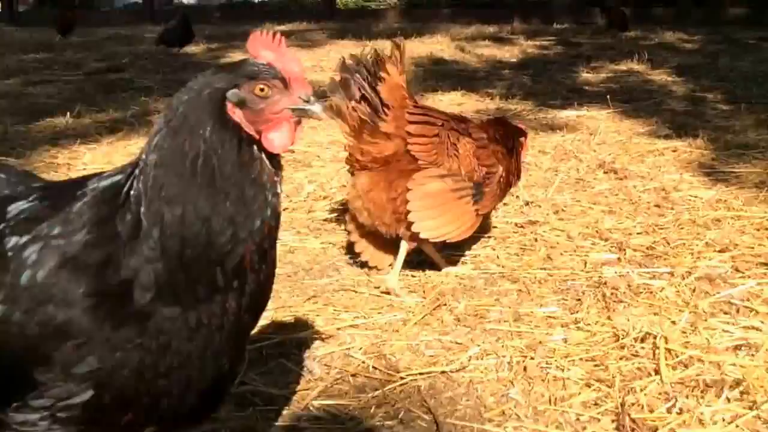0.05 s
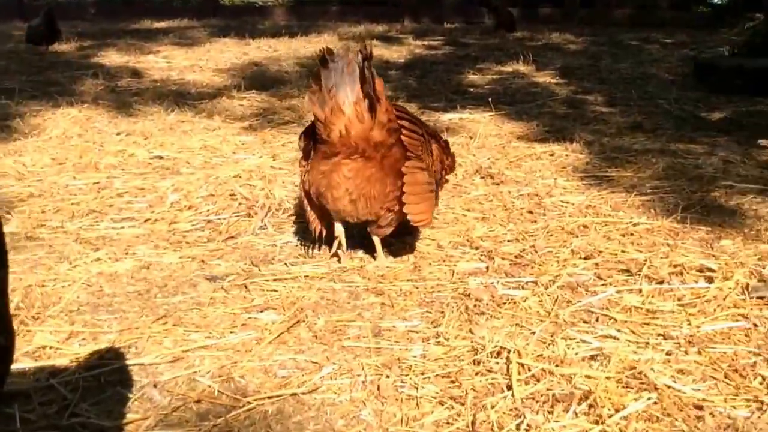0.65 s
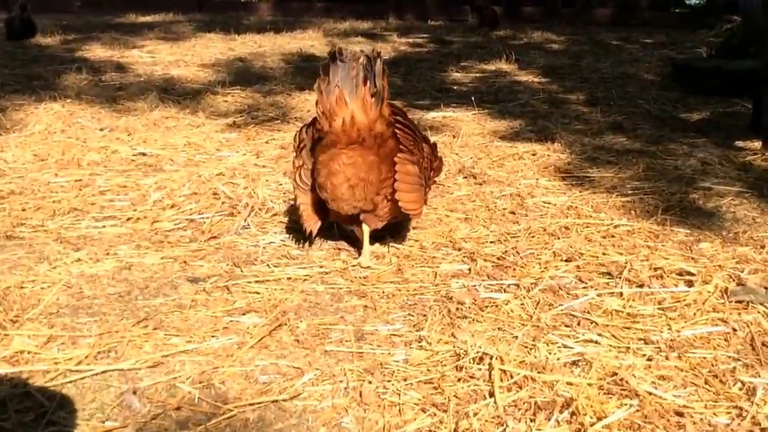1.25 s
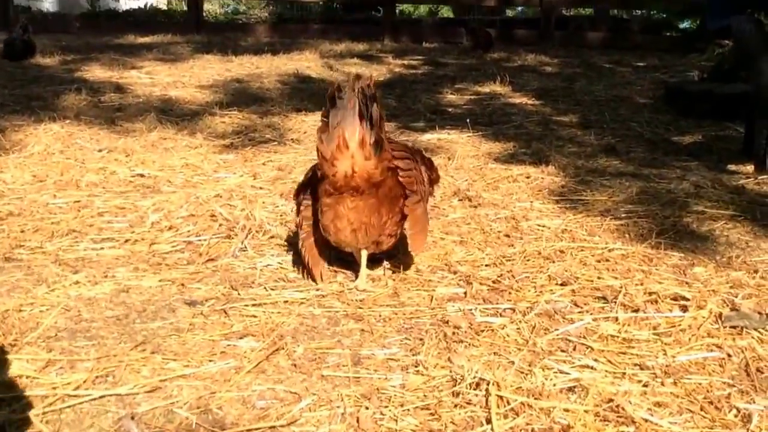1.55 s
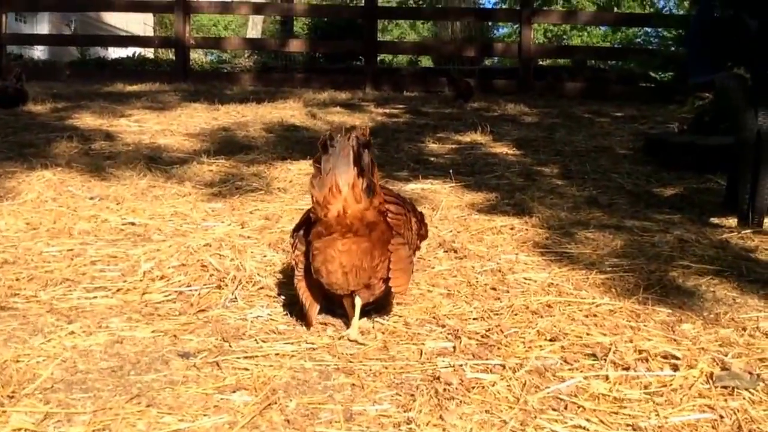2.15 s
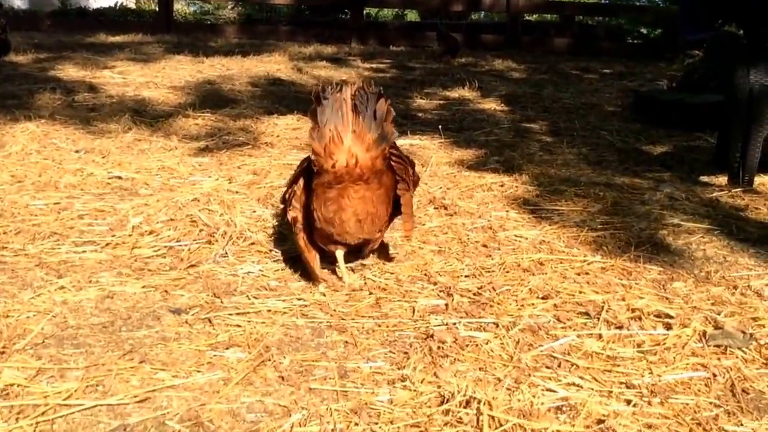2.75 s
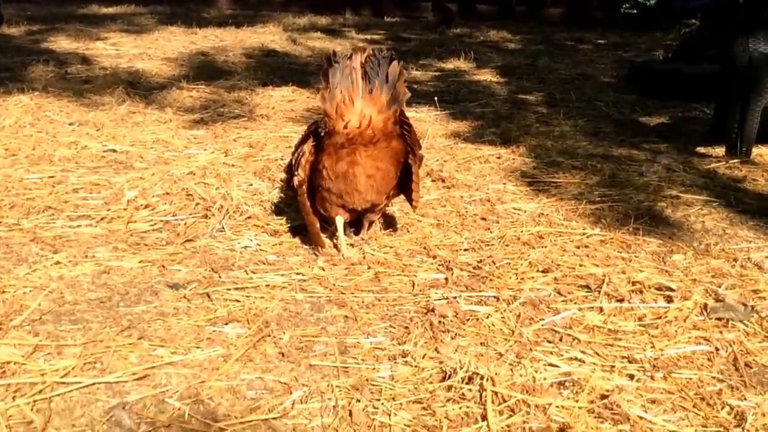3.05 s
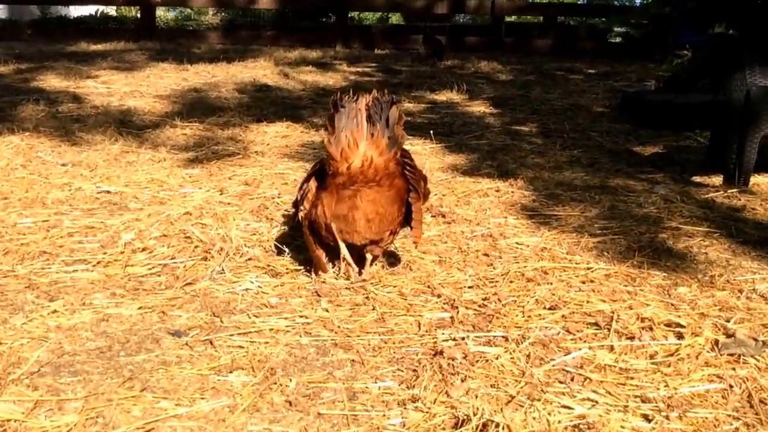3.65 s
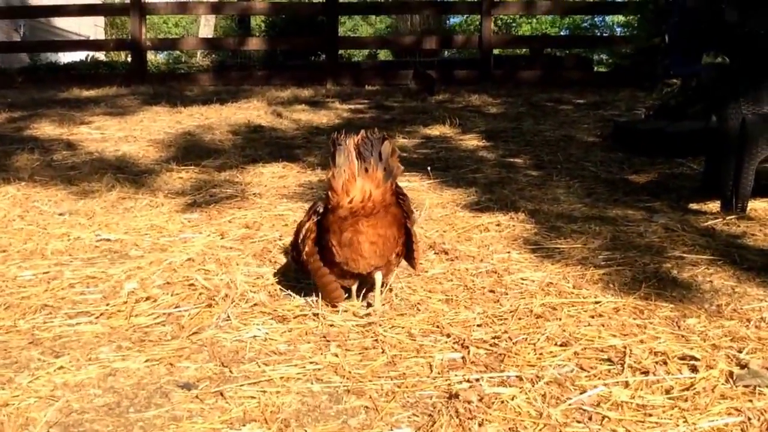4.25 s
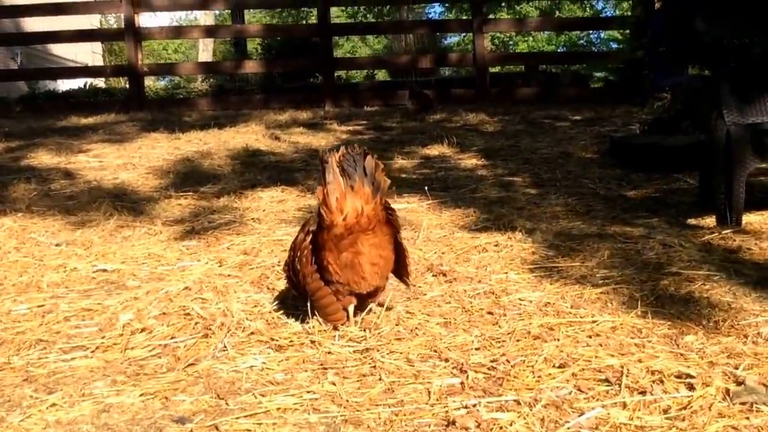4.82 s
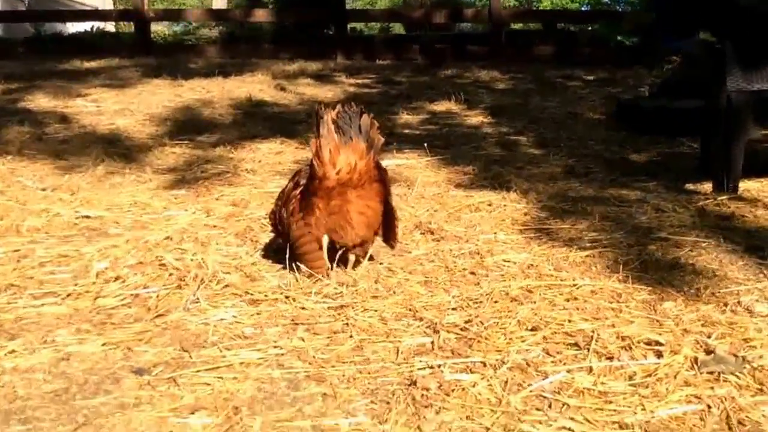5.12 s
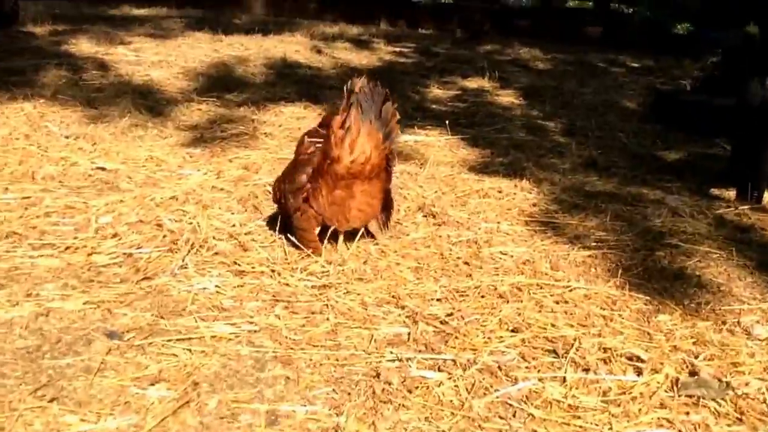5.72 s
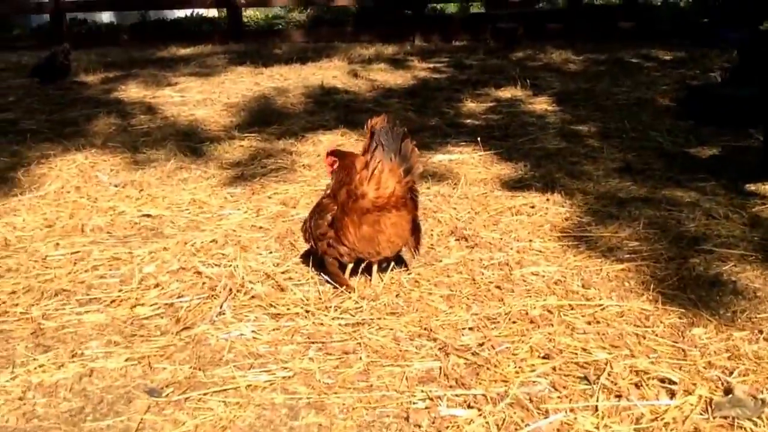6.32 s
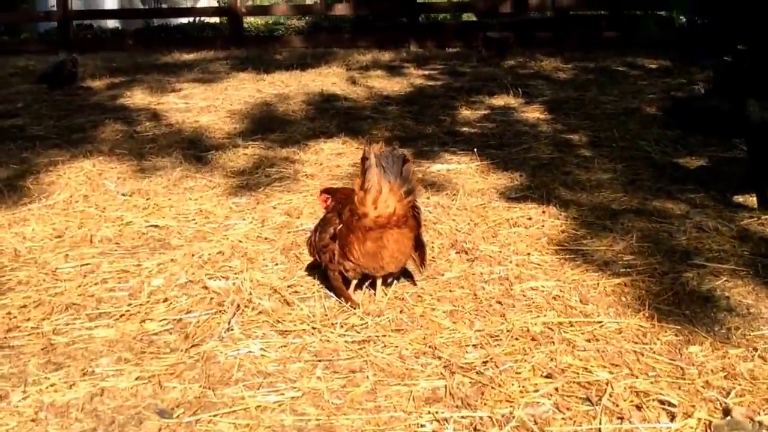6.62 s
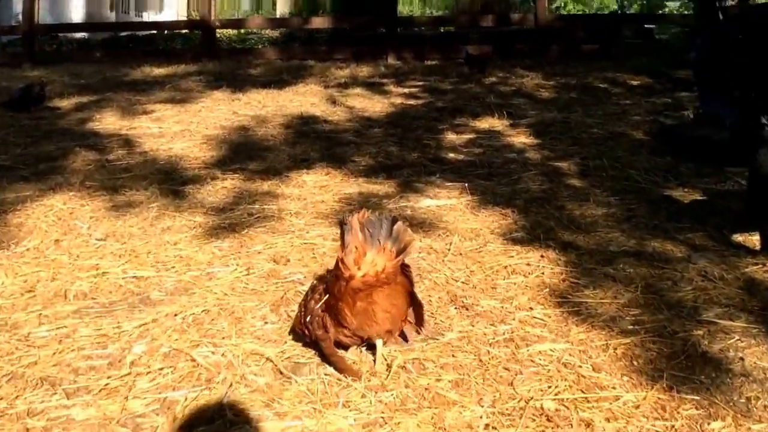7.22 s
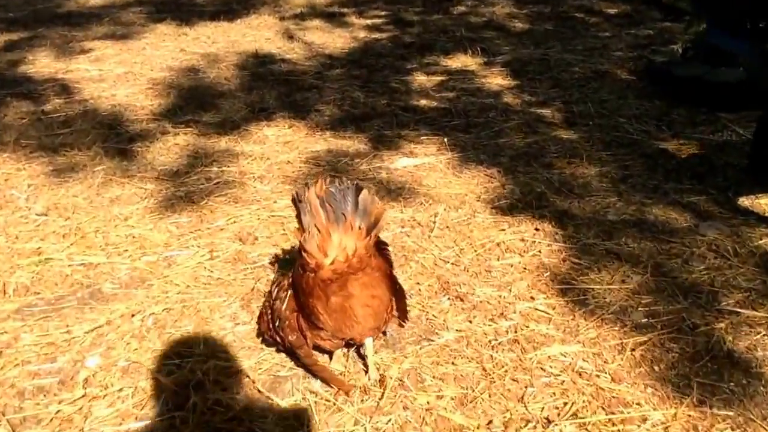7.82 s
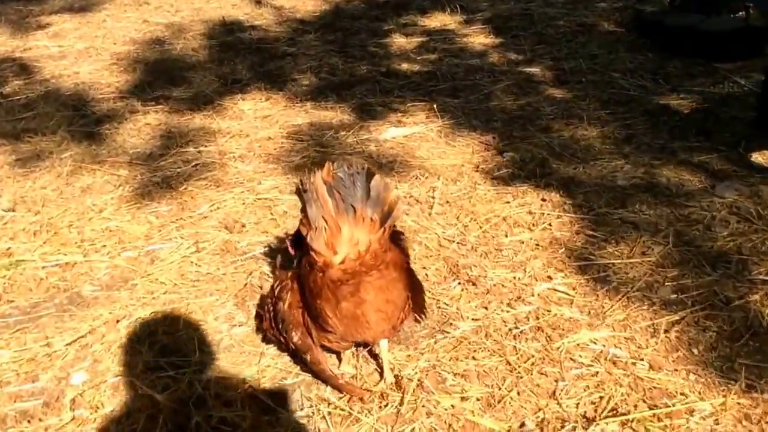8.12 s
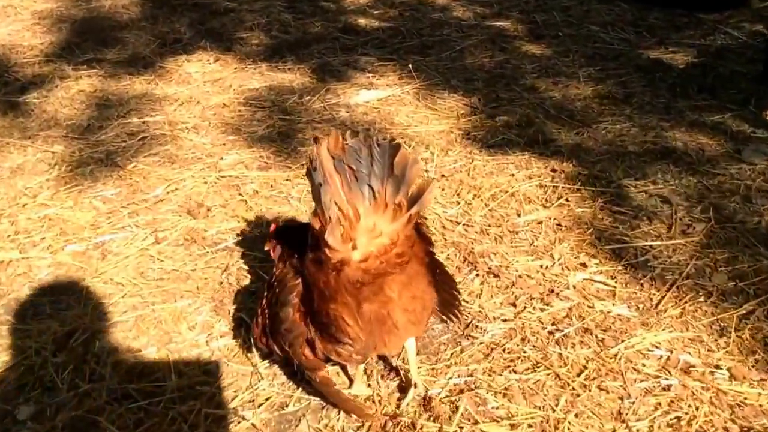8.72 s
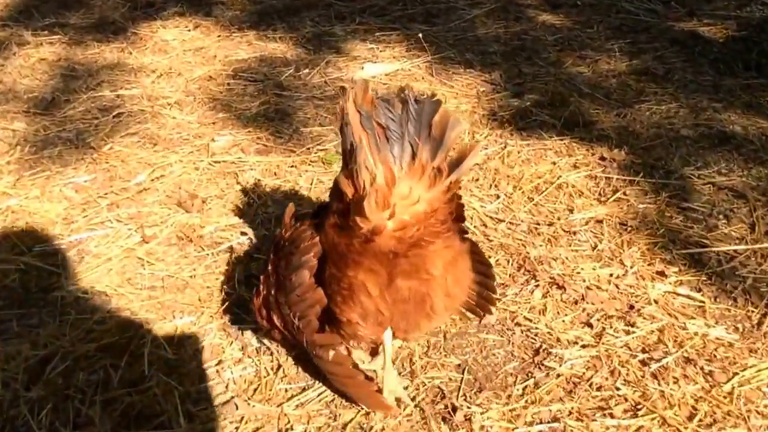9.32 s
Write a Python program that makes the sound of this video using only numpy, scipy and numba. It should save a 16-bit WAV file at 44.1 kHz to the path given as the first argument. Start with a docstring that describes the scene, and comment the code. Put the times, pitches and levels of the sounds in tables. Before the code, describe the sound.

Close to the microphone in an outdoor yard, a hen climbs from a soft moan into a loud rasping cry and three hoarse squawks. For a few seconds she only clucks quietly while straw rustles and snaps underfoot. Then she winds up again into six quick squawks. Light wind rumbles faintly on the microphone, with a few soft handling thumps.

```python
"""A hen near the microphone, in a straw-covered yard, winds up twice from a soft moan into a run of
hoarse squawks, with quiet clucks between. Puffs from her syrinx ring her throat and, as the beak opens,
its rasping upper resonances. Straw rustles and snaps underfoot and small birds whistle far off in the
open air. Light wind rumbles on the microphone, and handling gives it a few dull thumps."""
import sys
import numpy as np
from scipy import signal
from scipy.io import wavfile
from scipy.ndimage import uniform_filter1d
from numba import njit

SR = 44100
rng = np.random.default_rng(int(sys.argv[2]) if len(sys.argv) > 2 else 0)


def bounce(signal):
    """Save signal as a 16-bit WAV file at the path given by the first command-line argument."""
    frames = np.transpose(np.atleast_2d(signal))
    limited = np.clip(frames, -1, 1)
    pcm = np.round(limited * 32767).astype(np.int16)
    wavfile.write(sys.argv[1], SR, pcm)


N = 417627
TIME = np.arange(N) / SR


def from_db(db):
    """Decibels to gain."""
    return 10 ** (np.asarray(db) / 20)


def unit_rms(x):
    """Scale to unit power."""
    return x / np.sqrt(np.mean(x ** 2) + 1e-20)


def curves_at(rows, t):
    """The columns of a curve table, read at times t."""
    times, *columns = np.transpose(rows)
    return [np.interp(t, times, column) for column in columns]


def cut(x, hz, kind, order=2):
    """Butterworth filter."""
    return signal.sosfilt(signal.butter(order, np.clip(hz, 10, SR * .49), kind, fs=SR, output="sos"), x)


def drift(rate, t):
    """A random wander of rms 1, with about `rate` turns a second."""
    knots = np.arange(t[0], t[-1] + 2 / rate, 1 / rate)
    return unit_rms(np.interp(t, knots, rng.standard_normal(len(knots))))


@njit
def resonate(x, hz, width_hz):
    """A resonance whose centre moves sample by sample; gain 1 at its peak."""
    y, r = np.zeros(len(x)), np.exp(-np.pi * width_hz / SR)
    for i in range(2, len(x)):
        drive = (1 - r * r) / 2 * (x[i] - x[i - 2])
        y[i] = drive + 2 * r * np.cos(2 * np.pi * hz[i] / SR) * y[i - 1] - r * r * y[i - 2]
    return y


def formant(x, hz, width_hz):
    """A resonance applied twice, for steep skirts."""
    hz = hz * np.ones(len(x))
    return resonate(resonate(x, hz, float(width_hz)), hz, float(width_hz))


def steady(x, window_s):
    """Hold the power at 1, keeping flutter faster than the window."""
    size = max(int(window_s * SR), 2)
    return x / np.sqrt(np.abs(uniform_filter1d(uniform_filter1d(x * x, size), size)) + 1e-12)


def coloured_noise(spectrum, flicker_db, flicker_rate):
    """Half-octave bands of noise on a spectrum, each flickering by itself; rms 1."""
    hz, db = np.transpose(spectrum)
    edges = np.geomspace(hz[0], hz[-1], int(2 * np.log2(hz[-1] / hz[0])) + 2)
    white, out = rng.standard_normal((2, N)), 0
    for k, (low, high) in enumerate(zip(edges, edges[1:])):
        band_db = np.interp(np.log(low * high) / 2, np.log(hz), db)
        gain = from_db(band_db + flicker_db * drift(flicker_rate, TIME))
        out += gain * cut(white[k % 2], [low, high], "band")
    return unit_rms(out)


# Colour of the open air all round the yard: frequency_hz, relative_db
AIR_SPECTRUM = [(200, -10), (500, 2.5), (1000, -3.5), (2000, -5), (4200, -6.5), (6500, -11.5),
                (15000, -20.5)]
# Its level at the microphone: time_s, level_db
AIR_LEVEL = [(0, -71.5), (2.7, -70), (4.8, -67), (6.5, -65.5), (9.47, -64)]

def open_air():
    """A faint, broad hush that slowly grows."""
    level_db, = curves_at(AIR_LEVEL, TIME)
    return from_db(level_db) * coloured_noise(AIR_SPECTRUM, flicker_db=2, flicker_rate=10)


# Colour of the wind right on the microphone: frequency_hz, relative_db
WIND_SPECTRUM = [(25, -19), (50, -4), (110, 2.5), (180, -7), (300, -13), (600, -31)]
# Level of the low rumble, which dips under the hen's first loud cry: time_s, level_db
RUMBLE_LEVEL = [(0, -63), (.45, -60.5), (1.1, -60), (1.35, -72), (2.3, -64), (3.7, -61.5), (4.5, -60),
                (5.4, -62.5), (7.9, -60.5), (9.2, -62), (9.45, -74)]

def microphone_wind():
    """Light wind buffets the microphone with a low, uneven rumble."""
    level_db, = curves_at(RUMBLE_LEVEL, TIME)
    return from_db(level_db) * coloured_noise(WIND_SPECTRUM, flicker_db=3, flicker_rate=8)


# Soft, low handling thumps on the microphone: start_s, level_db
THUMPS = [(2.336, -52), (6.15, -56), (6.35, -55), (6.526, -52.5), (7.941, -50)]

def handling_thumps(low_hz=42, high_hz=115, decay_s=.055):
    """Dull thuds: low noise that starts at once and dies quickly."""
    envelope = sum(from_db(db) * (TIME > s) * np.exp(-np.minimum(np.abs(TIME - s) / decay_s, 20))
                   for s, db in THUMPS)
    rumble = steady(cut(rng.standard_normal(N), [low_hz, high_hz], "band"), window_s=.0366)
    return cut(envelope * rumble, 2 * high_hz, "low")


def yard_echo(x, echo_db=-30, t60_s=.3545, dull_hz=5000):
    """Fence and trees add a faint, dull tail to the direct sound."""
    t = np.arange(SR // 2) / SR
    scatter = rng.standard_normal(len(t)) * (t > .012) * from_db(-60 * t / t60_s)
    scatter = cut(scatter, dull_hz, "low")
    return x + from_db(echo_db) * signal.fftconvolve(x, scatter / np.linalg.norm(scatter))[:N]


# One whistle from a bird far off: time_s, pitch_hz, level_db
FAR_WHISTLE = [(3.77, 2100, -73), (4.05, 2140, -72.5), (4.11, 2330, -79.5), (4.17, 3300, -68.5),
               (4.2, 3400, -60.5), (4.26, 2460, -75)]

def bird_whistle():
    """A thin held whistle that ends in an arch."""
    pitch_hz, level_db = curves_at(FAR_WHISTLE, TIME)
    sounding = (TIME > FAR_WHISTLE[0][0]) & (TIME < FAR_WHISTLE[-1][0])
    cycles = np.cumsum(pitch_hz * (1 + .0074 * drift(100, TIME))) / SR
    return sounding * from_db(level_db) * np.sin(2 * np.pi * cycles)


# A distant bird's faint high note, from 0.5 s to 0.6 s: end_s, start_s, level_db, centre_hz, width_hz
FAR_HIGH_CALL = (0.6, 0.5, -73.5, 6752, 600)

def bird_high_call(end_s, start_s, level_db, centre_hz, width_hz):
    """A faint, sibilant note of narrow noise that swells and fades."""
    swell = np.sin(np.pi * np.clip((TIME - start_s) / (end_s - start_s), 0, 1))
    return from_db(level_db) * swell * unit_rms(formant(rng.standard_normal(N), centre_hz, width_hz))


# Hiss of the straw on the yard floor: frequency_hz, relative_db
STRAW_SPECTRUM = [(1470, -38), (2500, -15.5), (3240, -14), (4100, 3.5), (4530, -5.5), (6280, -14),
                  (9320, 1.5), (14700, -3.5), (15400, -10)]
# Swells of high hiss: straw scuffs, and the airy top of the hen's squawks near 1.5 s and 2.6 s:
# middle_s, relative_db, length_s
HISS_SWELLS = [(.01, -70, 0.057), (0.435, -74, 0.07), (1.513, -63, 0.24), (2.046, -56.5, 0.056),
               (2.57, -58, 0.077), (2.83, -60, 0.076), (3.376, -64.5, .09), (4.55, -70, 0.47),
               (5.017, -65.5, 0.075), (5.544, -65.5, .08), (5.704, -54, 0.088), (6.025, -59.5, 0.062),
               (8.242, -67.5, 0.077), (8.728, -62, 0.032), (9.053, -63.5, 0.29)]

def straw(tread_from_s=.86, cracks_per_s=650, crack_gain=.48, clump_db=2.5, gain_db=1):
    """Stalks slide with a hiss and crackle in clumps; swells of that hiss rise over the treading."""
    floor_db = np.where(TIME < tread_from_s, -84, -71) + 2.66 * drift(16, TIME)   # still, then trodden
    power = from_db(floor_db) ** 2
    for middle_s, db, length_s in HISS_SWELLS:
        power += from_db(db) ** 2 * np.exp(-np.minimum((2 * (TIME - middle_s) / length_s) ** 2, 20))
    cracking = rng.random(N) < cracks_per_s / SR
    sizes = from_db(11 * np.minimum(rng.exponential(1, N), 4)) * rng.choice([-1, 1], N)
    cracks = unit_rms(cut(formant(cracking * sizes, 8400, width_hz=7000), 2500, "high"))
    hiss = coloured_noise(STRAW_SPECTRUM, flicker_db=.6, flicker_rate=41)
    clumps = from_db(gain_db + clump_db * drift(80, TIME))
    return np.sqrt(power) * clumps * (hiss + crack_gain * cracks)


# Straw and twigs breaking underfoot: start_s, peak_db, band_hz
SNAPS = [(2.8257, -35, 994), (2.824, -42, 3060), (4.9012, -44, 3060), (5.264, -49, 2580),
         (5.414, -41.5, 6300), (5.416, -44, 1600), (5.507, -53, 9550), (5.63, -36.5, 10000),
         (5.658, -50, 9300)]

def snaps(crack_s=.0021, tail_s=.022, tail_gain=.12):
    """A dry stalk breaks: a sharp crack and a short crumbling tail."""
    out, t = np.zeros(N), np.arange(SR // 10) / SR
    envelope = np.exp(-t / crack_s) + tail_gain * np.exp(-t / tail_s)
    for start_s, peak_db, band_hz in SNAPS:
        burst = rng.standard_normal(len(t)) * envelope
        burst = cut(burst, [band_hz * .74, band_hz * 1.1], "band", order=1)
        i = int(start_s * SR)
        out[i:i + len(t)] += from_db(peak_db) * burst / np.abs(burst).max()
    return out


def syrinx(t, pitch_hz, rough, jitter_s=.00026, wander=.05, shimmer_db=4.5, hiss=.12):
    """One puff per cycle; when rough, the puffs stray in time and strength and carry turbulence."""
    cycles = np.cumsum(pitch_hz * (1 + wander * rough * drift(110, t))) / SR
    at = np.interp(np.arange(1, cycles[-1]), cycles, np.arange(len(t)))
    puff_rough = rough[at.astype(int)]
    timing, strength = rng.standard_normal((len(at), 2)).T
    at = np.clip(at + jitter_s * SR * puff_rough * timing, 0, len(t) - 2)
    size = from_db(shimmer_db * puff_rough * strength)
    sample, late = at.astype(int), at % 1   # each puff is shared between two samples
    puffs = np.bincount(sample, size * (1 - late), len(t)) + np.bincount(sample + 1, size * late, len(t))
    turbulence = hiss * rough * (1 + np.cos(2 * np.pi * cycles)) * rng.standard_normal(len(t))
    return puffs + turbulence


# The hen's quiet clucks, near the microphone: time_s, length_s, relative_db, throat_hz
CLUCKS = [(0.162, 0.02, -68.5, 740), (0.592, 0.0263, -51.5, 620), (2.219, 0.0357, -57, 600),
          (2.943, 0.029, -60.5, 610), (3.341, 0.022, -67, 660), (3.687, 0.026, -59, 606),
          (3.982, 0.025, -53.5, 637), (4.485, 0.028, -62, 640), (4.742, 0.026, -53.5, 614),
          (5.326, 0.028, -70, 860), (6.084, 0.043, -84, 493), (6.264, 0.025, -64.5, 535),
          (6.425, 0.033, -74, 620), (6.582, 0.039, -68.5, 530), (7.932, 0.031, -58.5, 694),
          (9.226, 0.03, -53, 560)]

def clucks(start_hz=290, top_hz=390, gain_db=5):
    """A short run of puffs, quickening, into a nearly closed throat that sinks in pitch."""
    out = np.zeros(N)
    for time_s, length_s, db, throat_hz in CLUCKS:
        t = np.arange(int((length_s + .073) * SR)) / SR
        progress = t / length_s
        pitch_hz = np.interp(progress, [0, .5], [start_hz, top_hz]) * (1 + .0477 * rng.standard_normal())
        puffs = syrinx(t, pitch_hz, rough=np.full(len(t), .45))
        puffs *= np.interp(progress, [0, .35, .85, 1.05], [.82, .23, .87, .025])
        body = formant(puffs, throat_hz * np.interp(progress, [.3, 1], [1.06, .78]), width_hz=377)
        body = cut(body, 1220, "low", order=4)
        i = int((time_s - .003) * SR)
        out[i:i + len(t)] += from_db(db + gain_db) * unit_rms(body)
    return out


# Moments when her hoarse voice rings pure: start_s, end_s, pitch_hz, relative_db
PURE_NOTES = [(0.904, .926, 942, 3), (1.187, 1.228, 995.4, 3), (1.256, 1.271, 996.4, 5),
              (1.319, 1.359, 1012, 2.5), (1.648, 1.678, 1008, 1.5), (1.79, 1.792, 994, 3.5),
              (2.535, 2.546, 996, 5.5), (7.265, 7.284, 1110, 4)]

def throat_note(t, puffs, throat_hz, lock_depth=.9):
    """The main resonance, now and then locking into a louder, pure note; returns sound and lock depth."""
    hoarse = steady(formant(puffs, throat_hz, width_hz=219), window_s=.012)
    start, end, hz, db = np.transpose(PURE_NOTES)
    locked = ((t > start[:, None]) & (t < end[:, None])).any(axis=0)
    lock = np.clip(lock_depth * uniform_filter1d(1. * locked, size=300), 0, 1)
    nearest = np.abs(t - (start + end)[:, None] / 2).argmin(axis=0)
    cycles = np.cumsum(hz[nearest] * (1 + .007 * drift(150, t))) / SR
    note = from_db(db[nearest]) * np.sqrt(2) * np.sin(2 * np.pi * cycles)
    return np.sqrt(1 - lock) * hoarse + np.sqrt(lock) * note, lock


# Upper resonances of throat and beak in three head postures: centre_hz, width_hz, relative_db
HEAD_UP = [(1350, 330, 13.5), (1734, 300, 3), (2310, 430, -2), (2977, 390, 0), (3970, 520, -9.5),
           (5225, 300, -18), (6304, 550, -19), (7930, 550, -20.5), (9080, 600, -23), (12480, 4000, -39.5)]
HEAD_TURNED = [(1390, 230, 6), (2015, 180, 4.5), (2550, 730, -2), (3004, 430, -0.5), (4220, 560, -5.5),
               (5430, 374, -20), (7600, 3100, -17)]
HEAD_LOW = [(1448, 370, 5), (1918, 290, 2.5), (2700, 236, 6), (3640, 500, -19), (4250, 380, -12.5),
            (6060, 1800, -28), (8700, 2000, -22.5)]
# Each posture: resonances, notch_hz
UP, TURNED, LOW = (HEAD_UP, 1700), (HEAD_TURNED, 1590), (HEAD_LOW, 2300)

def rasp(t, puffs, rasp_db, neck_tuning, resonances, notch_hz, notch_width_hz=110):
    """Upper resonances: a harder rasp is brighter; the stretching neck lowers those of the windpipe."""
    db_per_octave = .47 * np.clip(rasp_db + 16.5, -10, 10)
    rings = 0
    for k, (hz, width_hz, db) in enumerate(resonances):
        tuning = neck_tuning if 2700 < hz < 10000 else 1   # the windpipe's range
        gain = from_db(db + db_per_octave * np.log2(hz / 1500))
        rings += (-1) ** k * gain * formant(puffs, hz * tuning, width_hz)
    notch = [notch_hz - notch_width_hz / 2, notch_hz + notch_width_hz / 2]
    rings = cut(rings, notch, "bandstop", order=1)
    return from_db(rasp_db + 1.5 * drift(90, t)) * steady(rings, window_s=.0061)


def hen_voice(t, pitch_hz, rough, throat_hz, level_db, rasp_db, chest_db, attack_s, crest_s, stretch,
              posture, release_db=19, flutter_db=1.1, neck_settle_s=.12, muffle_hz=1020):
    """One call: the puffs ring the throat, a lower chest tone and the rasping beak resonances."""
    release = np.clip((t - crest_s) / max(t[-1] - crest_s, 1 / SR), 0, 1)
    level_db = level_db - release_db * release + flutter_db * drift(42, t)
    beak_open = np.clip(2 * rough - .3, 0, 1)
    puffs = syrinx(t, pitch_hz * (1 + .012 * drift(45, t)), rough)
    quiver = 1 + .057 * rough * drift(69.44, t)
    throat, lock = throat_note(t, puffs, throat_hz * quiver)
    rasp_db = rasp_db - 6.5 * release - 3 * lock   # a dying or locked note sheds rasp
    chest_gain = from_db(chest_db - 6 * (1 - beak_open) - 3.9 * lock)
    tone = throat + chest_gain * steady(formant(puffs, 2 * pitch_hz, width_hz=164), window_s=.0384)
    onset = 1 - np.exp(-(t - t[0]) / attack_s)
    ending = np.clip((t[-1] - t) / .0039, 0, 1)
    neck_tuning = 1 + stretch * np.exp(-np.cumsum(beak_open ** 4) / SR / neck_settle_s)
    # beak closed: a muffled moan over the hum of its fundamental
    hum = steady(formant(puffs, pitch_hz, width_hz=120), window_s=.021)
    moan = from_db(level_db) * cut(tone, muffle_hz, "low", order=8)
    moan += from_db(level_db / 2 - 32.75) * hum
    # beak open: a rasping cry over a low growl of slow, irregular puffs
    slow_puffs = syrinx(t, pitch_hz / 2, rough, jitter_s=.0007)
    growl = rough ** 3 * steady(cut(slow_puffs, [250, 560], "band"), window_s=.09)
    cry = from_db(level_db) * (tone + onset * rasp(t, puffs, rasp_db, neck_tuning, *posture))
    cry += from_db(level_db / 2 - 40.75) * growl
    call = onset * ending * ((1 - beak_open) * moan + beak_open * cry)
    return np.interp(TIME, t, call, left=0, right=0)


# Her climbs from moan to cry; the first breaks register: time_s, pitch_hz, roughness (0-1), throat_hz
FIRST_CLIMB = [(.25, 220.3, 0.17, 680), (.41, 215.7, 0.24, 653), (0.459, 238, 0.12, 690),
               (0.579, 252.3, .13, 684), (.66, 283.6, .26, 773), (.742, 270, .24, 747),
               (.752, 397.2, 0.23, 715), (.86, 438, .32, 803), (.89, 323.1, 0.6, 844),
               (1.03, 313.6, 0.68, 994), (1.42, 372.7, 0.66, 970)]
SECOND_CLIMB = [(6.631, 378.4, .25, 750), (6.9, 487.7, .47, 1062), (7.08, 386.2, .72, 1152),
                (7.4, 363.1, .62, 1050)]
# How each climb swells at the microphone: time_s, relative_db
FIRST_SWELL, SECOND_SWELL = [
    [(0.275, -53), (0.607, -41.5), (0.681, -44.5), (0.857, -30), (0.899, -36), (0.917, -28.5),
     (0.931, -32.5), (1.305, -26)],
    [(6.65, -65.5), (6.81, -46.5), (6.832, -54), (6.842, -42), (6.998, -37), (7.038, -38.5),
     (7.264, -33), (7.395, -30.5)],
]
# The two wind-ups, near by; rasp and chest are relative to the throat note:
# start_s, end_s, release_s, rasp_db, rasp_db_per_s, chest_db, stretch_share, climb, swell, posture
WIND_UPS = [(0.254, 1.468, .045, -3.5, 25, -5.5, 0.23, FIRST_CLIMB, FIRST_SWELL, UP),
            (6.63, 7.442, 0.048, -16.5, 7.5, -16, 0.32, SECOND_CLIMB, SECOND_SWELL, TURNED)]

def wind_up(start_s, end_s, release_s, rasp_db, rasp_db_per_s, chest_db, stretch, climb, swell, posture,
            attack_s=.0098, gain_db=-.47):
    """A long call that climbs from a moan to a cry, its rasp growing steadily up to the crest."""
    t, crest_s = TIME[(TIME >= start_s) & (TIME <= end_s)], end_s - release_s
    pitch_hz, rough, throat_hz = curves_at(climb, t)
    swell_db, = curves_at(swell, t)
    rasp_db = rasp_db - rasp_db_per_s * np.maximum(crest_s - t, 0)
    return hen_voice(t, pitch_hz, rough, throat_hz, swell_db + gain_db, rasp_db, chest_db,
                     attack_s, crest_s, stretch, posture)


# Her squawks, near the microphone; rasp and chest are relative to the throat note: start_s, end_s,
# attack_s, release_s, crest_db, swell_db, rasp_db, chest_db, stretch_share, throat_hz, posture
SQUAWKS = [(1.558, 1.872, 0.0039, 0.052, -26, 4, -8, -7.5, 0.13, 969, UP),
           (1.948, 2.176, 0.0052, 0.039, -27, 2.5, -11.5, -9, 0.056, 938, UP),
           (2.333, 2.643, .003, .05, -26.5, 7, -14.5, -11.5, 0, 992, LOW),
           (7.489, 7.678, 0.01, 0.077, -30, 9, -17, -32, 0.023, 1070, TURNED),
           (7.759, 7.947, 0.0079, 0.071, -31, 10, -16.5, -32, 0.0067, 1050, TURNED),
           (8.133, 8.456, 0.0074, .065, -29.5, 9, -12.5, -20.5, .08, 1042, LOW),
           (8.553, 8.791, 0.0049, 0.047, -30, 5.5, -12, -24, 0.0094, 1026, LOW),
           (8.893, 9.126, 0.0027, .062, -29.5, 8, -11, -24, 0.011, 1000, LOW),
           (9.303, 9.558, 0.0023, 0.052, -30.5, 8.5, -12.5, -19, 0, 1032, LOW)]

def squawk(start_s, end_s, attack_s, release_s, crest_db, swell_db, rasp_db, chest_db, stretch,
           throat_hz, posture, crest_pitch_hz=346.6, roughness=.872, slack_db=22):
    """Effort swells to a crest and goes slack; throat and rasp rise with it while the puffs slow."""
    t, crest_s = TIME[(TIME >= start_s) & (TIME <= end_s)], end_s - release_s
    push_db = -swell_db * np.clip((crest_s - t) / (crest_s - start_s), 0, 1) ** 1.298
    effort_db = push_db - slack_db * np.clip((t - crest_s) / release_s, 0, 1)
    pitch_hz = crest_pitch_hz * (1 - .0362 * effort_db)
    throat_hz = throat_hz * (1 + .0124 * effort_db)
    return hen_voice(t, pitch_hz, np.full(len(t), roughness), throat_hz, crest_db + push_db,
                     rasp_db + .37 * push_db, chest_db, attack_s, crest_s, stretch, posture)


def scene():
    """One microphone in the yard: the hen and the straw near by, birds far off, wind and open air."""
    hen = sum(wind_up(*row) for row in WIND_UPS) + sum(squawk(*row) for row in SQUAWKS) + clucks()
    background = microphone_wind() + open_air()
    echoing = yard_echo(hen + snaps() + bird_whistle() + bird_high_call(*FAR_HIGH_CALL))
    return (echoing + straw() + handling_thumps() + background)[None]


def record(dry, cutoff_hz=15500):
    """The highest treble is cut steeply."""
    return signal.sosfilt(signal.ellip(12, .1, 80, cutoff_hz, fs=SR, output="sos"), dry)


dry = scene()
out = record(dry)
bounce(out)
```